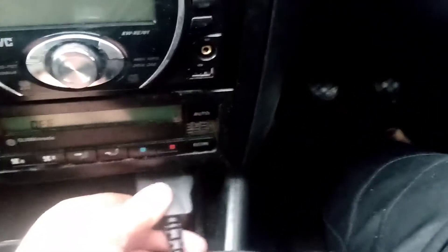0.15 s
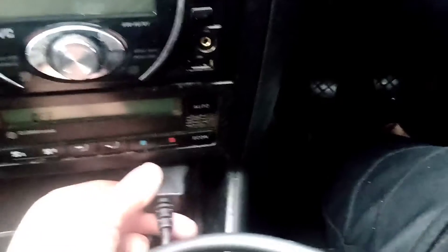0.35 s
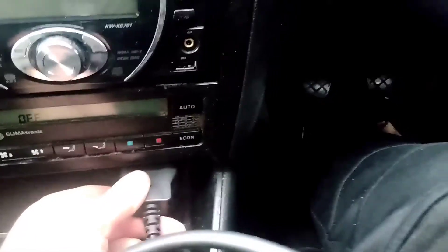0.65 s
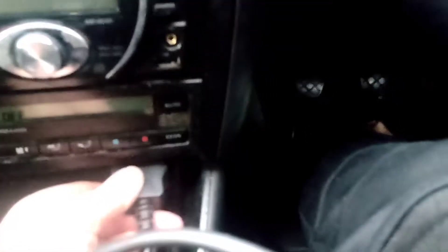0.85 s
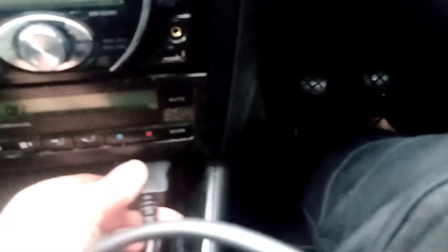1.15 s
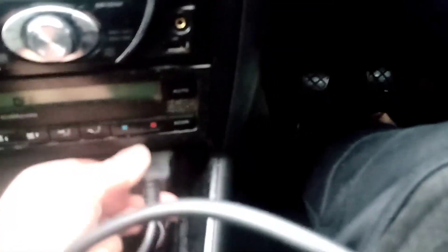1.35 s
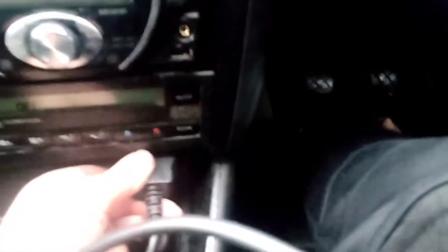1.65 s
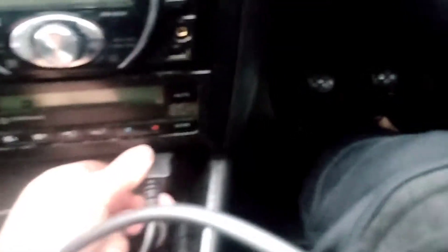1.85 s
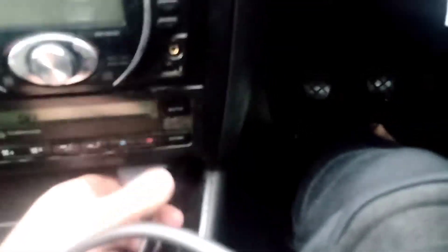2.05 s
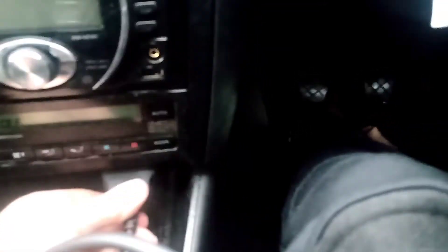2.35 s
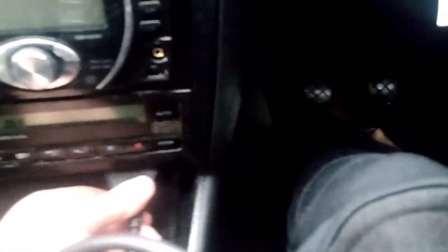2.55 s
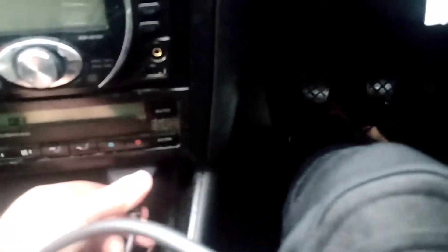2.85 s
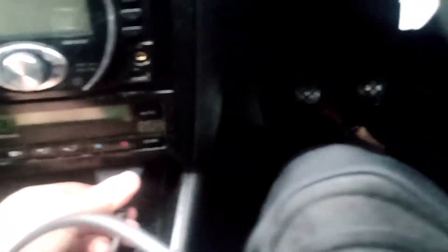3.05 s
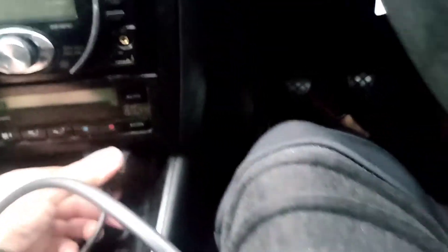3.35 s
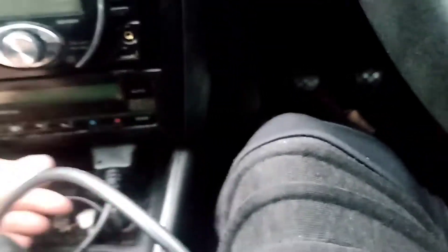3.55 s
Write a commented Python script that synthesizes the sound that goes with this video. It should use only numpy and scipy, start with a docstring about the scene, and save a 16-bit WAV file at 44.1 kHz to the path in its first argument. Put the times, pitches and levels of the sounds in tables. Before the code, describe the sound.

Plastic plug clicking, scraping and being pushed into a socket inside a quiet car.

```python
"""Diagnostic plug in a parked car

Two microphones in the dead cabin hear a hand work a plastic plug against its dashboard socket.
The plug knocks and scrapes on the rim, then judders home in seven quick slips; each contact briefly
rings the plug and trim. The dashboard rumbles under the leaning arm and the cable sheath ticks.
Sleeve and cable rustle, loudest as the hand draws back."""
import sys
import numpy as np
from scipy import signal
from scipy.fft import rfft, irfft
from scipy.io import wavfile

SR = 44100
rng = np.random.default_rng(int(sys.argv[2]) if len(sys.argv) > 2 else 0)


def output_pcm(signal):
    """Save a mono or channel-first signal as 16-bit PCM at the path in sys.argv[1].

    Samples are clipped to [-1, 1] before scaling.
    """
    pcm = np.clip(np.atleast_2d(signal).T, -1, 1) * 32767
    wavfile.write(sys.argv[1], SR, np.round(pcm).astype(np.int16))


N = 163170
RING_SIZE = 4096  # samples given to one contact
AGE = np.arange(RING_SIZE) / SR

# Modes of the loose plug and trim. Each row: frequency in Hz, level in dB, seconds to fall 60 dB,
# lag at the left microphone in ms, left minus right in dB.
LOOSE_MODES = [(280,-13,.1,0,0),(388,-9,.11,.25,-1),(438,-10,.09,.25,-1),(565,-4,.09,.1,-1),(690,-6.5,.06,.2,3),(826,1,.085,.31,-1.5),(935,-8,.06,.2,-1),(1212,-6,.065,.15,-2),(1450,-8.5,.06,.2,5),(1690,-6,.07,.2,0),(1930,-7.5,.06,.1,2),(2285,-11.5,.06,.05,3),(2620,-6.5,.05,.17,2)]
# Modes of the plug held in the socket, with the same columns.
SEATED_MODES = [(250,-8,.1,0,1),(570,-4.5,.07,.1,0),(660,-3.5,.06,.2,4),(745,-2.5,.06,.3,3),(820,-3,.06,.31,-1.5),(1220,-6,.06,.15,-3),(1690,3,.06,.15,2),(2285,-5.5,.06,.05,5),(2680,-9,.04,.17,2),(3790,-10,.05,.1,0),(6150,-14,.04,0,0)]
# The bright snap of plastic. Each row: frequency in Hz, spectral level in dB.
SNAP_SPECTRUM = [(1500,-20),(3000,-3),(4400,-1),(5400,.5),(7200,1.5),(9500,-3),(12500,-7),(16000,-11.5)]
# Cloth and cabin air at the pair. Each row: frequency in Hz, left-right correlation.
DIFFUSE_LIKENESS = [(100,.9),(600,.6),(2000,.3),(12000,.2)]

# Each envelope: attack in seconds, decay in seconds, tail level in dB, tail length in seconds.
KNOCK_SHAPE, SNAP_SHAPE = (.0006, .0055, -7, .026), (.0006, .0038, -13.5, .026)
TYPICAL_KNOCK_DB = -42


def from_db(db):
    """Decibels to gain."""
    return 10 ** (np.asarray(db) / 20)


def at_hz(points, hz):
    """Read a table on a log-frequency axis."""
    freqs, values = np.transpose(points)
    return np.interp(np.log(hz + 1), np.log(freqs), values)


def fader(points):
    """Gain at every sample, from rows of seconds and dB."""
    return from_db(np.interp(np.arange(N) / SR, *np.transpose(points)))


def pan(db):
    """Left and right gains, db apart, at constant total power."""
    gains = from_db(np.array([[db], [-db]]) / 2)
    return gains / np.sqrt(np.mean(gains ** 2))


def unit(x, seconds=None):
    """Scale to rms 1, over the first seconds or throughout."""
    head = x if seconds is None else x[:, :int(seconds * SR)]
    return x / np.sqrt(np.mean(head ** 2) + 1e-20)


def tilted(table, db_per_octave, pivot_hz):
    """Brighten or dull a spectrum or modes; the slope ends 0.8 octave either side of the pivot."""
    return [(hz, db + db_per_octave * np.clip(np.log2(hz / pivot_hz), -.8, .8), *rest)
            for hz, db, *rest in table]


def noise(spectrum, size, likeness=None, balance=None, ripple_db=0, ripple_spacing_hz=170):
    """Coloured noise at the two microphones; ripple gives a spot on the plug its own resonances."""
    # Unless others are given. Each row: frequency in Hz, left-right correlation.
    usual_likeness = [(100,.92),(300,.85),(500,.85),(1000,.68),(1600,.3),(4000,.1),(7000,.35),(15000,.45)]
    # Unless others are given. Each row: frequency in Hz, left minus right in dB.
    usual_balance = [(300,0),(850,-1),(1400,3),(2400,4.5),(4000,3),(6000,1),(8500,-3),(14000,-1)]
    # Phase across the pair. Each row: frequency in Hz, lead of the left microphone in radians.
    lead = [(250,0),(400,-.7),(560,-.4),(800,-1.55),(1100,-.6),(2000,-2),(4500,-1.5),(6500,0)]
    hz = np.arange(size // 2 + 1) * SR / size
    mid, side = rfft(rng.standard_normal((2, size)))
    alike = np.clip(at_hz(likeness or usual_likeness, hz), -1, 1)
    sign = np.array([[1], [-1]])
    pair = np.sqrt(1 + alike) * mid + sign * np.sqrt(1 - alike) * side
    ripple = np.interp(hz / ripple_spacing_hz, np.arange(len(hz)), rng.standard_normal(len(hz)))
    side_db = sign * at_hz(balance or usual_balance, hz) / 2
    gain = from_db(at_hz(spectrum, hz) + ripple_db * ripple + side_db)
    return unit(irfft(pair * gain * np.exp(.5j * sign * at_hz(lead, hz)), size))


def grains(per_s, spread_db=2.3):
    """Random impulses of uneven size."""
    sizes = from_db(spread_db * np.minimum(rng.exponential(1, N), 3)) * rng.choice([-1, 1], N)
    return unit(sizes * (rng.random(N) < per_s / SR))


def cabin():
    """The quiet cabin: a faint, steady, mostly low noise."""
    # Each row: frequency in Hz, spectral level in dB.
    spectrum = [(20,-26),(40,-22),(51,7),(60,-14),(100,-14),(190,-13),(280,-10.5),(420,-20),(590,-20),(800,-29),(1500,-36),(4000,-38),(6000,-37.5),(7700,-32),(10000,-36.5),(16000,-43)]
    return from_db(-68.6) * noise(spectrum, N, DIFFUSE_LIKENESS)


def rustle(flutter_db=1.5, flutter_hz=90):
    """Sleeve and cable slide with a fine, uneven grain."""
    # Their movement. Each row: time in seconds, level in dB.
    movement = [(0,-85),(.72,-82),(.78,-70),(.82,-77),(.93,-69),(1.0,-81),(1.2,-83),(1.5,-70.5),(1.65,-68.5),(1.79,-76),(1.86,-62),(2.12,-72),(2.3,-82),(2.58,-65),(2.8,-82),(2.95,-71),(3.14,-54),(3.33,-55.5),(3.4,-53.5),(3.54,-50.5),(3.62,-51),(3.7,-47.5)]
    # Sliding cloth. Each row: frequency in Hz, spectral level in dB.
    cloth = [(30,-4),(55,4),(150,7),(300,5),(600,0),(1300,-4),(1950,4.5),(2900,-4),(4300,-3.5),(5400,-9),(7600,-5),(11000,-12),(16000,-18.5)]
    # The sleeve lies to the left. Each row: frequency in Hz, left minus right in dB.
    balance = [(600,1),(1300,6),(2400,8),(4400,2.5),(8000,0)]
    flutter = np.interp(np.arange(N) * flutter_hz / SR, np.arange(N), rng.standard_normal(N))
    return fader(movement) * from_db(flutter_db * flutter) * noise(cloth, N, DIFFUSE_LIKENESS, balance)


def rumble():
    """The dashboard rumbles as the arm leans on it."""
    # The arm's pressure. Each row: time in seconds, level in dB.
    lean = [(0,-88),(1.2,-80),(1.7,-68),(1.8,-74),(2.03,-61),(2.15,-80),(2.35,-80),(2.55,-64),(2.8,-78),(3.2,-61),(3.7,-66)]
    # The panel's low response. Each row: frequency in Hz, spectral level in dB.
    spectrum = [(20,-28),(38,-20),(52,5),(63,-7),(85,-3),(135,-6),(250,-35),(600,-70)]
    return fader(lean) * noise(spectrum, N)


def ticks(per_s=45, decay_s=.0015):
    """The cable sheath gives faint dry ticks as it bends."""
    tick = unit(noise(SNAP_SPECTRUM, RING_SIZE) * np.exp(-AGE / decay_s)) / np.sqrt(RING_SIZE)
    return from_db(-86) * signal.fftconvolve([grains(per_s)], tick, axes=1)[:, :N]


def burst(spectrum, shape, damp_db, ripple_db=0):
    """Dense ringing: a fast decay, then a short diffuse tail cut off quickly, as by a noise gate."""
    attack_s, decay_s, tail_db, tail_s = shape
    decay_power = np.exp(-2 * AGE / decay_s)
    tail_power = from_db(tail_db - damp_db) ** 2 * np.exp(-2 * (AGE / tail_s) ** 2.5)
    envelope = (1 - np.exp(-AGE / attack_s)) * np.sqrt(decay_power + tail_power)
    return noise(spectrum, RING_SIZE, ripple_db=ripple_db) * envelope


def ring(modes, attack_s, spread_db=2.2, hold_s=.033):
    """Each contact strikes the modes with strengths of its own; they fade fast after hold_s."""
    out = 0
    for hz, db, t60, lag_ms, pan_db in modes:
        t = np.maximum(AGE - np.array([[lag_ms], [0]]) * 1e-3, 0)
        envelope = from_db(db + spread_db * rng.normal() - 60 * t / t60) * (1 - np.exp(-t / attack_s))
        out = out + pan(pan_db) * envelope * np.sin(2 * np.pi * (hz * t + rng.random()))
    return out * np.exp(-(AGE / hold_s) ** 4)


def contact(strike, modes, shapes=(KNOCK_SHAPE, SNAP_SHAPE), knock_pivot_hz=1200, snap_pivot_hz=8500):
    """Plug meets socket: a low thud of the dashboard, a hollow knock and a bright snap."""
    # The dashboard's low register. Each row: frequency in Hz, spectral level in dB.
    thud_spectrum = [(25,-31),(38,-21),(52,4),(64,-9),(85,-2.5),(125,0),(190,-5),(260,-.5),(380,-2.5),(520,-19),(1000,-50)]
    # Its middle register, with the same columns.
    knock_spectrum = [(220,-30),(400,-6),(600,-2),(820,4),(1050,-5),(1500,-6),(2000,-4.5),(2650,-5),(3300,-12),(4300,-15),(6000,-29),(12000,-60)]
    thud_db, knock_db, snap_db, pan_db, knock_tilt, snap_tilt = strike
    force_db = max(knock_db - TYPICAL_KNOCK_DB, -10)
    damp_db = .45 * force_db  # hard contacts are crisper, with less tail
    blunt = from_db(.55 * max(-force_db, 0))  # light taps build more slowly
    knock_shape, snap_shape = [(attack_s * blunt, *rest) for attack_s, *rest in shapes]
    thud = burst(thud_spectrum, (.004, .012, -5, .028), damp_db)
    dense = burst(tilted(knock_spectrum, knock_tilt, knock_pivot_hz), knock_shape, damp_db, 2.25)
    tones = ring(tilted(modes, knock_tilt, knock_pivot_hz), attack_s=knock_shape[0] / 2)
    snap = burst(tilted(SNAP_SPECTRUM, snap_tilt, snap_pivot_hz), snap_shape, damp_db, ripple_db=4.5)
    knock = from_db(-3.8) * unit(dense, .01) + from_db(-1.7) * unit(tones, .01)
    return (from_db(thud_db - 1.5) * unit(thud, .024)
            + from_db(knock_db) * knock
            + from_db(snap_db + .5) * pan(pan_db) * unit(snap, .01))


def place(events):
    """Mix short sounds, each given with its start in seconds."""
    out = np.zeros((2, N + RING_SIZE))
    for start_s, sound in events:
        start = int(start_s * SR)
        out[:, start:start + RING_SIZE] += sound
    return out[:, :N]


def knocks():
    """The loose plug knocks on the socket rim and rings the trim."""
    # Each row: start in seconds, thud, knock and snap levels in dB, the snap's left minus right in dB,
    # knock and snap tilts in dB per octave.
    strikes = [(0.005, -76, -60, -73, 0, -2, 0), (0.201, -80, -72, -72, 0, 5, -4),
               (0.3195, -50, -34.5, -43, -2, 6, 7), (0.336, -51, -49, -75, 0, -6, 0),
               (0.3558, -51, -35, -43, -2, -1, 3), (0.3815, -46, -35, -46.5, -3, 3.5, 0),
               (0.398, -53, -38.5, -50.5, 0, 0, -3), (0.4368, -59, -45.5, -60, -2, 3, -2),
               (0.5475, -61, -47.5, -67, 1, 3, 4), (0.7495, -54, -44, -53, -3, 4, -1),
               (0.756, -53, -47, -63, 1, 4, -1), (0.8462, -59, -47.5, -62, -4, 4, -1),
               (0.924, -61, -55, -73, -2, -3, 1), (0.963, -59, -70, -80, 0, 0, 4),
               (1.0635, -52, -37, -49, -5, 2, 2), (1.089, -49, -45, -59, 0, 1, 0),
               (1.105, -56, -36.5, -52, -2, -1, -2), (1.152, -68, -64, -76, 1, 2, -4),
               (1.274, -58, -44, -61, -2, 0, 0), (1.3372, -54, -40, -49, -3, 3, 3),
               (1.3645, -47, -37, -42, -4, 0, 3), (1.385, -49, -49, -59, 1, 0, 3),
               (1.398, -47, -52, -66, 0, -3, 2), (1.435, -68, -58, -57, -2, 3, 4),
               (1.465, -59, -50, -66, 2, -1, 0), (1.6, -62, -49, -61, 2, 0, 1),
               (1.637, -54, -49, -59, 8, 0, 0), (1.6528, -47, -36, -44.5, -1, 0, 2),
               (1.671, -47, -35.5, -44, -3, 5, 0), (1.692, -45, -39.5, -59, -1, -2, 1),
               (1.704, -51, -37, -48, 0, -1, 1), (1.82, -50, -44, -52, 0, 0, 2),
               (1.831, -50, -42, -54, 0, 1, 0), (1.9085, -52, -45, -57, 1, -2, -2),
               (1.9395, -52, -38, -51, 1, -2, -2), (1.977, -46, -40, -51, -1, -1, -1),
               (1.987, -46, -38, -50, -1, 0, -2), (2.057, -51, -39.5, -51, -2, 2, 1),
               (2.067, -51, -33, -44, -1, 1, 1), (2.3725, -57, -42.5, -60, -4, 3, 0),
               (2.43, -51, -39, -53, -1, -1, -2), (2.456, -49, -38, -55, -2, 0, -3),
               (2.474, -47, -34, -47.5, -3, -1, -1), (2.509, -50, -43, -58, -1, 0, -2),
               (2.543, -52, -43, -56, -2, -2, 2), (2.552, -49, -35.5, -42, -1, -2, 3),
               (2.59, -49, -38, -50, -2, -2, 3), (2.607, -52, -35, -47.5, -1, 2, 0),
               (2.613, -49, -35.5, -49, -1, 0, -1), (2.677, -63, -52, -66, 0, -1, 0),
               (2.737, -68, -49, -65, -1, -2, -4), (2.977, -51, -40.5, -54, -1, 0, -2),
               (2.999, -49, -39.5, -56, -1, 0, 1), (3.36, -64, -53, -66, 0, 1, 1),
               (3.523, -57, -49, -59, 1, 3, 1)]
    return place((start_s, contact(strike, LOOSE_MODES)) for start_s, *strike in strikes)


def pings(half_width_hz=460, decay_s=.009):
    """The plug catches a stiff edge of the socket, which rings with a tight cluster of modes."""
    # Each row: start in seconds, centre frequency in Hz, level in dB.
    catches = [(.3558, 3700, -49), (.693, 4200, -68), (.924, 3450, -63), (1.3645, 2700, -44),
               (1.3645, 7300, -45.5), (1.435, 3500, -58), (1.672, 2550, -39), (1.672, 5100, -46)]
    envelope = (1 - np.exp(-AGE / SNAP_SHAPE[0])) * np.exp(-AGE / decay_s)
    events = []
    for start_s, centre_hz, db in catches:
        cluster = [(hz, -20 * np.log10(1 + ((hz - centre_hz) / half_width_hz) ** 4))
                   for hz in centre_hz * np.geomspace(.5, 2, num=81)]
        ping = unit(noise(cluster, RING_SIZE) * envelope, .01)
        events.append((start_s, from_db(db) * ping))
    return place(events)


def friction(effort, modes, thud_db, snap_db, spots=6, grains_per_s=1900):
    """Tiny catches of plastic on plastic ring one body; thud and snap are relative to the knock."""
    out, force = 0, fader(effort)
    levels = TYPICAL_KNOCK_DB + np.array([thud_db, 0, snap_db])
    for _ in range(spots):
        response = unit(contact((*levels, -1.5, 0, 0), modes))  # snap nudged right, no tilt
        catches = grains(grains_per_s / spots) * force
        out = out + signal.fftconvolve([catches], response, axes=1)[:, :N]
    return out / np.sqrt(spots * RING_SIZE)


def scrape():
    """The loose plug scrapes over the rim between knocks."""
    # Each row: time in seconds, level in dB.
    effort = [(1.25,-85),(1.275,-52),(1.295,-80),(1.335,-75),(1.345,-48),(1.385,-47),(1.4,-80),(1.55,-78),(1.64,-53),(1.68,-41),(1.715,-43),(1.73,-75),(1.895,-75),(1.915,-45),(1.99,-40),(2.028,-40),(2.04,-62),(2.07,-46),(2.09,-85),(2.365,-85),(2.375,-44.5),(2.45,-43),(2.49,-56),(2.535,-55),(2.56,-46),(2.622,-42),(2.645,-68),(2.725,-55),(2.76,-85),(2.92,-78),(2.98,-48),(3.02,-44),(3.06,-85)]
    return friction(effort, LOOSE_MODES, thud_db=-9, snap_db=-11.5)


def drag():
    """The plug rubs inside the socket between slips."""
    # Each row: time in seconds, level in dB.
    effort = [(3.02,-120),(3.04,-63),(3.085,-48),(3.2,-45),(3.29,-46.5),(3.315,-120)]
    return friction(effort, SEATED_MODES, thud_db=-5, snap_db=-9.5)


def slips():
    """The plug sticks and slips as it slides home, each jolt with a softer attack than a knock."""
    # Each row: start in seconds, thud, knock and snap levels in dB, the snap's left minus right in dB,
    # knock and snap tilts in dB per octave.
    jolts = [(3.0585, -53, -37, -45, 0, -1, -2), (3.0995, -52, -36.5, -44, -3, 0, -1),
             (3.14, -47, -36, -42.5, -3, 1, 0), (3.179, -47, -33, -42, -2, 2, 1),
             (3.218, -53, -32.5, -45.5, -4, 1, 1), (3.2575, -46, -33, -48, -3, -1, 0),
             (3.288, -52, -35, -46, -1, 2, 0)]
    shapes = (.006, .0052, -18, .022), (.005, .0052, -22, .03)  # knock and snap envelopes
    return place((start_s, contact(jolt, SEATED_MODES, shapes)) for start_s, *jolt in jolts)


def scene():
    """Cabin, arm, cable and plug together at the two microphones."""
    return cabin() + rustle() + rumble() + ticks() + knocks() + pings() + scrape() + drag() + slips()


def record(dry, cutoff_hz=16000):
    """The top is cut steeply."""
    return signal.sosfilt(signal.ellip(12, .1, 70, cutoff_hz, fs=SR, output="sos"), dry)


dry = scene()
out = record(dry)
output_pcm(out)
```